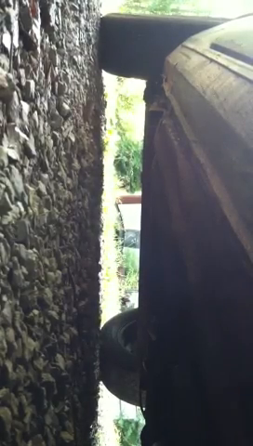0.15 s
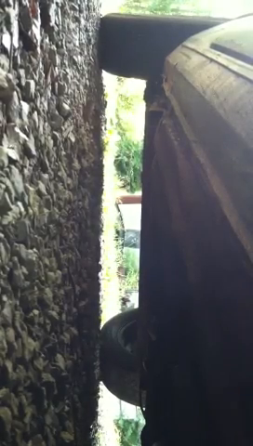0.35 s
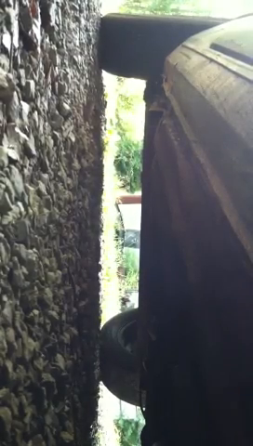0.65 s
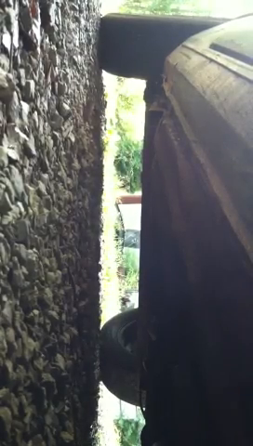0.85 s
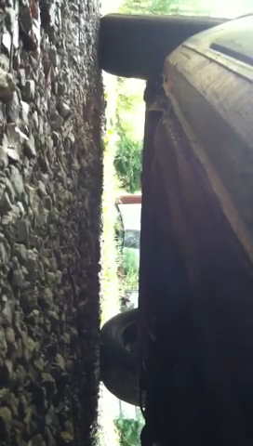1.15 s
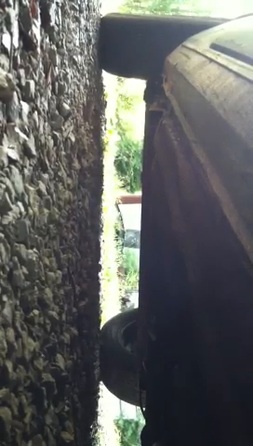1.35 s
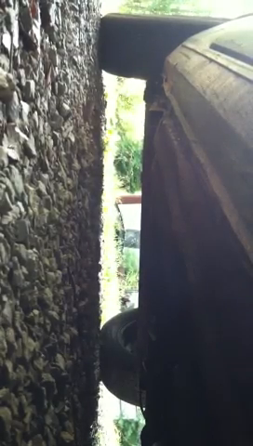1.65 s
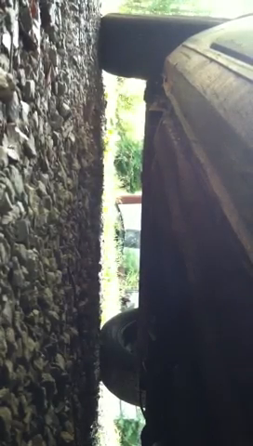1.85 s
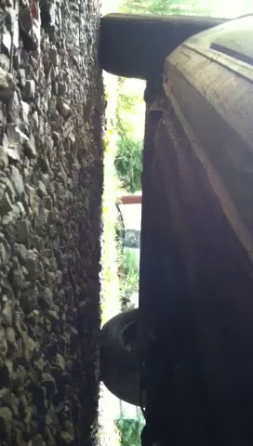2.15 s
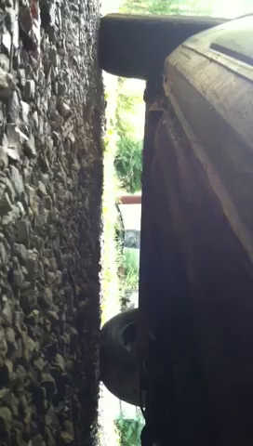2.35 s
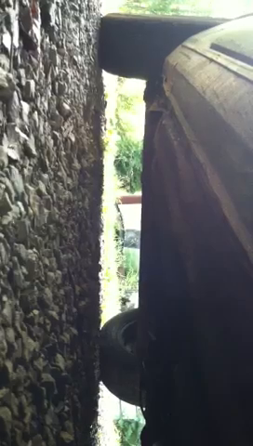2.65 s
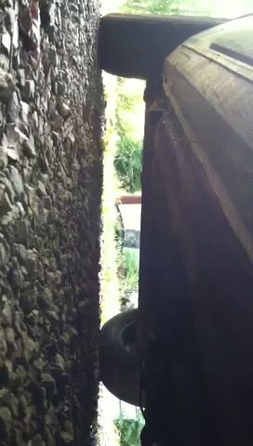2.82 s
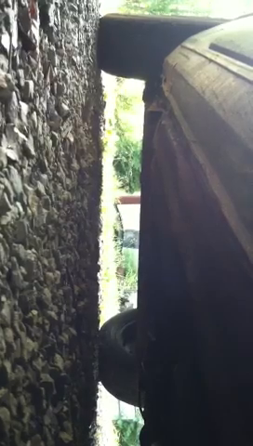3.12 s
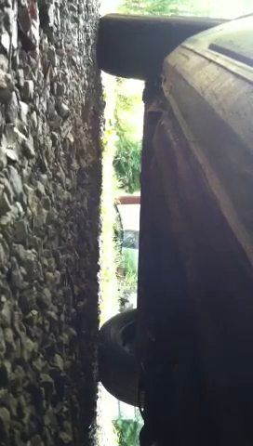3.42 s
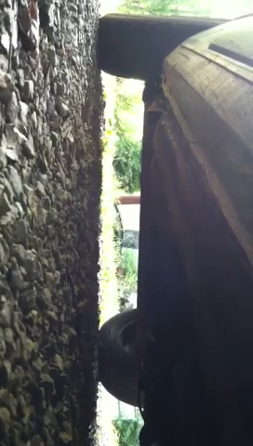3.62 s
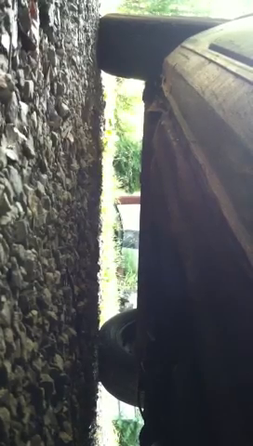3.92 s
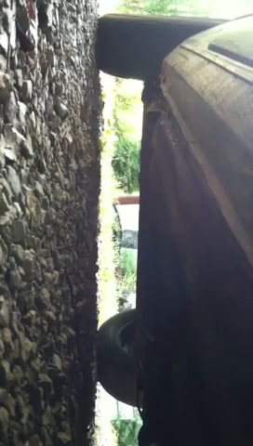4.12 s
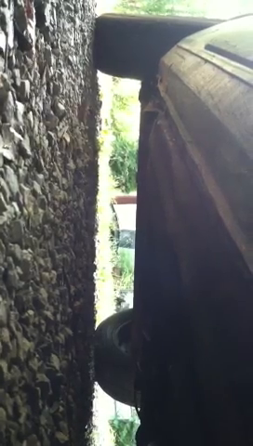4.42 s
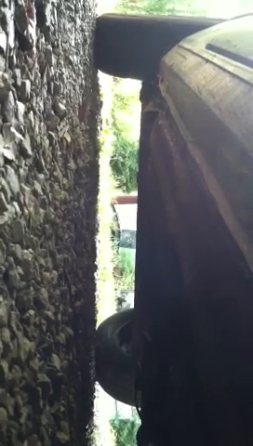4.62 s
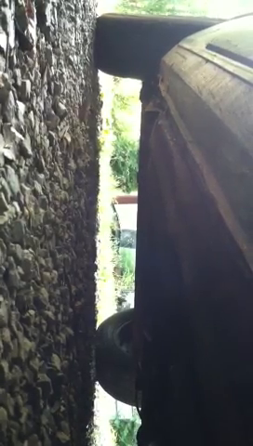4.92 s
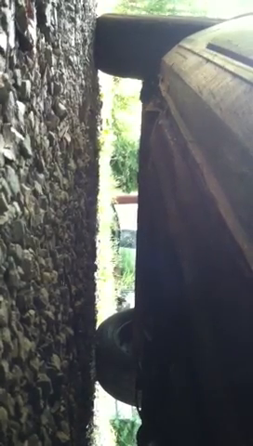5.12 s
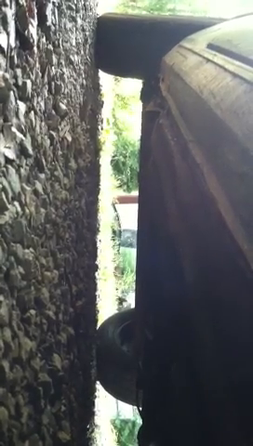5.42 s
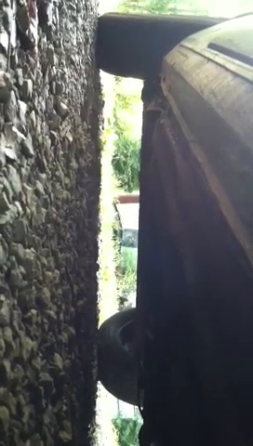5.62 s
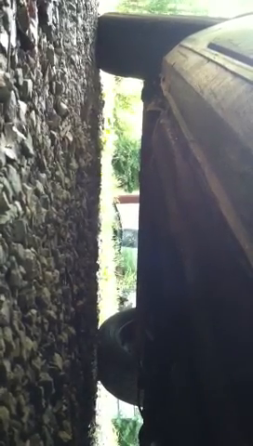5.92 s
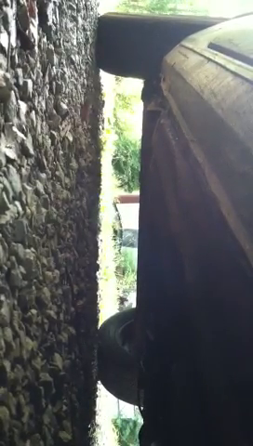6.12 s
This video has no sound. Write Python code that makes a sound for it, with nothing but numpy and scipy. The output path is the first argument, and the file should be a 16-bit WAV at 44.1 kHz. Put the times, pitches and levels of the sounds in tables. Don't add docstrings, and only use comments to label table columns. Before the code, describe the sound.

A loud, flattened close microphone beneath a car catches a low, lumpy idle from an open pipe, each firing a ringing boom with a burst of coarse hiss and metallic ticking. The pace wavers slightly. Then the fire stops, the pistons puff air ever more slowly, linkage knocks dully, thin whistling squeaks fade, and a quiet outdoor yard is left.

```python
import sys
import numpy as np
from scipy import signal
from scipy.fft import rfft, irfft, next_fast_len
from scipy.io import wavfile
from scipy.ndimage import uniform_filter1d

SR = 44100
rng = np.random.default_rng(int(sys.argv[2]) if len(sys.argv) > 2 else 0)


def amplitude_ratio(level_db):
    exponent = np.asarray(level_db, float) / 20
    return 10 ** exponent


def pcm_store(signal):
    levels = np.round(np.clip(np.atleast_2d(signal), -1, 1) * 32767)
    wavfile.write(sys.argv[1], SR, levels.astype(np.int16).T)


N = 276507
KEY_OFF_S = 4.7
IDLE_PER_S = 37.4


def evened(x):
    return x / np.sqrt(np.mean(x ** 2) + 1e-20)


def add(mix, s, sound):
    at = round(s * SR)
    sound = sound[max(-at, 0):]
    part = mix[max(at, 0):][:len(sound)]
    part += sound[:len(part)]


def curve(rows, column):
    rows = np.array(rows)
    return np.interp(np.arange(N) / SR, rows[:, 0], rows[:, column])


def filtered(x, order, hz, kind="low"):
    return signal.sosfilt(signal.butter(order, hz, kind, fs=SR, output="sos"), x)


def resonate(x, hz, width):
    turn = np.exp(2j * np.pi * np.cumsum(hz * np.ones(len(x))) / SR)
    r = np.exp(-np.pi * width / SR)
    return 2 * (turn * signal.lfilter([1 - r], [1, -r], x / turn)).real


def coloured(x, spectrum):
    hz, db = np.transpose(spectrum)
    size = next_fast_len(N)
    bins = np.log(np.fft.rfftfreq(size, 1 / SR) + 1)
    return irfft(rfft(x, size) * amplitude_ratio(np.interp(bins, np.log(hz), db)), size)[:N]


def patchy(x, depth_db):
    z = signal.stft(x, nperseg=256)[2]
    field = rng.standard_normal(z.shape[::-1])
    field = uniform_filter1d(uniform_filter1d(field, size=5, axis=0), size=8, axis=1)
    return signal.istft(z * amplitude_ratio(depth_db * evened(field).T), nperseg=256)[1][:N]


# (time [s], rate [firings/s])
SPEED = [(0.0, 38.01), (0.298, 36.25), (0.478, 36.46), (0.715, 37.62), (0.999, 38.37), (1.542, 35.94),
         (2.111, 39.23), (2.73, 36.13), (2.913, 36.2), (3.487, 39.29), (3.997, 37.0), (4.29, 36.6),
         (4.7, 39.43)]


def firings():
    turns = np.cumsum(curve(SPEED, column=1)) / SR - .34
    turns = turns[:round(SPEED[-1][0] * SR)]
    times = np.nonzero(np.diff(np.floor(turns)))[0] / SR
    return np.r_[times[0] - np.arange(len(CYLINDERS), 0, -1) / SPEED[0][1], times]


def ring(modes, spread_db, detune):
    t = np.arange(12000)[:, None] / SR
    hz, db, t60, sign = np.transpose(modes)
    uneven, off = rng.standard_normal((2, len(modes)))
    fade = amplitude_ratio(db + spread_db * uneven - 60 * t / t60)
    return fade * np.sin(2 * np.pi * hz * (1 + detune * off) * t) @ np.sign(sign)


# (delay [ms], level [dB], manifold echo [ms], its gain [factor],
# collector echo [ms], its gain [factor])
CYLINDERS = [(-1.24, -1.1, 5.17, -0.17, 8.29, 0.37), (-1.65, -1.0, 3.67, -0.18, 8.46, 0.29),
             (-1.29, -1.7, 4.42, 0.15, 7.93, 0.4), (-1.7, -1.4, 2.83, -0.17, 8.63, 0.25)]
# (pitch [Hz], level [dB], time to fade by 60 dB [s], polarity [+1 or -1])
PIPE = [(110, -13.5, 0.033, 1), (131, -41.5, 0.84, 1), (177.7, -12.5, 0.057, -1), (200.93, -8, 0.34, -1),
        (206, -14.5, 0.3, -1), (226, -11.5, 0.061, 1), (283, -7.5, 0.081, 1), (308.6, -19.5, 0.13, -1),
        (332, -24, 0.13, 1), (372.8, -16.5, 0.11, -1), (432.5, -27.5, 0.26, -1), (488, -27, 0.105, -1),
        (575, -40.5, 0.072, -1), (766, -41, 0.053, -1)]


def exhaust_boom(times, last):
    boom = np.zeros(N)
    surge = np.interp(times, *np.transpose(SPEED)) - IDLE_PER_S
    pop_db = 0 * last
    for k, (s, jitter) in enumerate(zip(times, rng.standard_normal(len(times)))):
        late_ms, db, near_ms, near, far_ms, far = CYLINDERS[k % 4]
        pulse = amplitude_ratio(db - 0.25 + 0.28 * surge[k] + pop_db[k]) * ring(PIPE, 0.95, 0.0011)
        for echo_ms, gain in (0, 1), (near_ms, near), (far_ms, far):
            add(boom, s + (late_ms + echo_ms) / 1000 + .0001 * jitter, gain * pulse)
    return boom


def puffs(times, levels_db, rise, fall, rest):
    t, out = np.arange(4000) / SR, np.full(N, rest)
    for s, db in zip(times, levels_db):
        add(out, s, amplitude_ratio(db) * (1 - np.exp(-(t / rise) ** 2)) * np.exp(-t / fall))
    return out


BRANCH_HZ = [770, 495, 872, 557]


def swirl(times, habit):
    own, out = [], np.zeros(N)
    for gust, hz in zip(rng.standard_normal((len(CYLINDERS), 1100)), BRANCH_HZ):
        own.append(evened(gust + 0.44 * evened(resonate(gust, hz, 160))))
    for k, s in enumerate(times):
        add(out, s, own[k % len(own)])
    return habit * out + np.sqrt(1 - min(habit, 1) ** 2) * rng.standard_normal(N)


# (pitch [Hz], width [Hz], level [dB])
ROUGH = [(231, 30, -10), (296.8, 15.6, -7.5), (351.7, 31.8, 2), (371.6, 55.7, 2), (481.9, 34.4, -0.5),
         (593.5, 44.4, -5), (656.5, 80, -7.5), (744, 24.4, -10), (827, 52, -11), (913.7, 15.6, -12),
         (1014, 54, -12.5), (1127, 24, -16), (1169, 23, -15)]


def rough_gas(noise, pitch_scale):
    out = np.zeros(N)
    for k, (hz, width, db) in enumerate(ROUGH):
        out += (-1) ** k * amplitude_ratio(db) / np.sqrt(width) * resonate(noise, hz * pitch_scale, width)
    return out


# (pitch [Hz], level [dB per Hz])
JET = [(740, -7), (1250, 4.5), (1370, -44), (1480, 1), (1710, -1.5), (2300, 5), (2670, 0.5), (3000, -7.5),
       (3290, -32.5), (3980, -17.5), (5580, -7.5), (6400, -15.5), (12000, -19.5), (14200, -30.5),
       (15500, -33)]
# (pitch [Hz], width [Hz], level [dB])
SHIELD = [(1465, 8.3, 2.5), (1824, 17, 5.5), (3230, 33, -1), (3350, 140, -3), (5400, 58, -11),
          (5600, 50, -36)]


def jet(flow):
    noise, fizz = rng.standard_normal((2, N))
    shield = np.zeros(N)
    for hz, width, db in SHIELD:
        shield += amplitude_ratio(db) / np.sqrt(width) * resonate(flow * noise, hz, width)
    low = filtered(evened(flow * noise), 2, 8000)
    top = filtered(evened(flow ** 1.25 * fizz), 2, 8000, "high")
    return evened(coloured(patchy(low + top, depth_db=3.0), JET)) + amplitude_ratio(-8.5) * evened(shield)


def ticks(times):
    out, t = np.zeros(N), np.arange(900) / SR
    for s, (band, place, late, size) in zip(np.repeat(times, 2), rng.random((2 * len(times), 4))):
        hz, db = (2350, -27) if band < .6 else (5600, -37)
        tick = np.sin(2 * np.pi * hz * (0.793 + 0.37 * place) * t)
        tick *= np.exp(-t / 0.00073) * (1 - np.exp(-t / 0.0002))
        add(out, s + .007 * late ** 3, amplitude_ratio(db - 3.0 * np.log(size + .08)) * tick)
    return out


# (rough gas level [dB], hiss level [dB])
GASPS = [(1.5, 5), (1, 5.5), (-1.5, 5), (1, 7)]


def idle():
    times = firings()
    last = times == times[-1]
    boom = exhaust_boom(times, last)
    uneven = rng.standard_normal((len(times), 2)).T
    gasp_db = np.resize(GASPS, (len(times), 2)).T
    on = np.arange(N) < KEY_OFF_S * SR
    throttle = curve(SPEED, column=1) - IDLE_PER_S

    rough_db = gasp_db[0] + 5.5 * last + 2.1 * uneven[0]
    flow = on * puffs(times - .004, rough_db, rise=0.0005, fall=0.011, rest=0.36)
    rough = rough_gas(flow * swirl(times - .004, habit=0.67), 0.98)
    rough *= amplitude_ratio(-23.5 + 0.8 * throttle) / rough[on].std()

    steady = .08 * amplitude_ratio(4.5 * throttle)
    early = puffs(times - .011, gasp_db[1] - 18.5, rise=0.00083, fall=.005, rest=0.)
    hiss_db = gasp_db[1] - 2 * last + 1.2 * uneven[1]
    main = puffs(times - .001, hiss_db, rise=0.0018, fall=0.01, rest=steady)
    hiss = jet(on * (early + main))
    hiss *= amplitude_ratio(-39 + 0.37 * throttle) / hiss[on].std()
    return boom + rough + hiss + ticks(times)


# (pitch [Hz], level [dB per Hz])
YARD = [(24, -49), (40, -14.5), (96, -9), (129, -5.5), (160, -0.5), (237, -4), (350, -13), (468, -17),
        (504, -12), (744, -23.5), (1210, -24.5), (3900, -40.5), (5100, -27.5), (6190, -42), (13500, -47.5)]


def yard():
    return amplitude_ratio(-58.5) * evened(coloured(rng.standard_normal(N), YARD))


# (pitch [Hz], level [dB], time to fade by 60 dB [s],
# polarity [+1 or -1])
COLD = [(62, -15.5, 0.46, 1), (97, -21, 0.18, 1), (129, 2, 0.044, -1), (175.5, 5, 0.13, 1),
        (212.8, -6, 0.32, 1), (233.4, -5.5, 0.36, 1), (304, -28, 0.086, -1), (356.7, -9, 0.21, 1),
        (483, -31, 0.3, -1), (624, -21, 0.083, 1), (860, -19, .14, -1)]


def thumps(times, levels_db):
    t, boom = np.arange(N) / SR, np.zeros(N)
    cooling = np.interp(t, [4.7, 4.95], [.97, .86])
    for s, db in zip(times, levels_db):
        pitch_scale = cooling[round(s * SR)] / cooling[-1]
        thump = ring(np.multiply(COLD, [pitch_scale, 1, 1, 1]), 2.2, .012)
        thump = filtered(thump * (1 - np.exp(-t[:len(thump)] / 0.0028)), 3, 80, "high")
        add(boom, s, amplitude_ratio(db - 2.0) * thump / abs(thump).max())
    return boom


# (pitch [Hz], level [dB per Hz])
LEAK = [(60, -7), (170, 2.5), (300, -10), (500, -9.5), (900, -14.5), (1600, -14), (2300, -16.5),
        (2900, -24), (5000, -24.5), (10000, -30), (15000, -48.5)]


def leftover_gas():
    t = np.arange(N) / SR
    since_off = t - KEY_OFF_S
    rough = rough_gas(rng.standard_normal(N), 0.99)
    rough /= rough[round(4.7 * SR):round(5.2 * SR)].std()
    rough *= amplitude_ratio(-40 - 51 * np.maximum(since_off - 0.46, 0))
    leak_db = -41 - 13.5 * since_off - 150 * np.maximum(t - 5.59, 0)
    leak = amplitude_ratio(leak_db) * evened(coloured(patchy(rng.standard_normal(N), depth_db=1.0), LEAK))
    return (rough + leak) * np.clip(since_off / .02, 0, 1)


# (time [s], level [dB])
STROKES = [(4.708, -7), (4.737, -5.5), (4.763, -7), (4.798, -3.5), (4.828, -7.5), (4.862, -7),
           (4.898, -8.5), (4.94, -10), (4.983, -9), (5.037, -12), (5.098, -10.5), (5.178, -18),
           (5.309, -31.5)]


def rundown():
    times, thump_db = np.transpose(STROKES)
    hiss_db = -33 + 0.45 * thump_db - 6 * (times - KEY_OFF_S)
    flow = puffs(times, hiss_db, rise=0.00086, fall=0.014, rest=0.)
    hiss = flow.std() * jet(flow)
    rasp_db = -15.5 + 0.72 * thump_db
    flow = puffs(times - .003, rasp_db, rise=0.00069, fall=0.013, rest=0.)
    rasp = flow.std() * evened(rough_gas(flow * rng.standard_normal(N), .985))
    return thumps(times, thump_db) + hiss + rasp + leftover_gas()


# (start [s], length [s], pitch [Hz], wobble [Hz], level [dB])
SQUEAKS = [
    (5.355, .11, 3079, 55, -54),
    (5.53, .12, 3079, 80, -59.5),
    (5.21, .05, 3079, 50, -62),
    (5.31, .5, 2245, 14, -62),
    (5.3, .38, 1556, 60, -59),
    (5.45, .33, 2003, 6, -67),
]


def squeaks():
    out = np.zeros(N)
    for s, length, hz, width, db in SQUEAKS:
        wobble = width * evened(uniform_filter1d(rng.standard_normal(round(length * SR)), size=400))
        whistle = np.sin(2 * np.pi * np.cumsum(hz + wobble) / SR)
        fade = amplitude_ratio(db - np.linspace(0, 17, len(whistle)))
        add(out, s, fade * whistle * signal.windows.tukey(len(whistle), .3))
    return out


# (time [s], level [dB], pitch [Hz], time to fade by 60 dB [s])
CLUNKS = [
    (5.223, -36, 1120, .07),
    (5.311, -34, 1110, .08),
    (5.313, -37, 1560, .09),
    (5.33, -39, 2240, .09),
    (5.34, -43, 1600, .1),
    (5.485, -46, 1600, .1),
    (5.491, -48, 2200, .08),
    (5.777, -63, 1600, .06),
]


def clunks():
    out, t = np.zeros(N), np.arange(6000) / SR
    for s, db, hz, t60 in CLUNKS:
        knock = rng.standard_normal(len(t)) * amplitude_ratio(-60 * t / t60) * (1 - np.exp(-t / 0.0029))
        body = resonate(resonate(knock, hz, 360), hz, 320)
        body += 0.13 * resonate(resonate(knock, 1100, 1230), 1100, 1200)
        add(out, s, amplitude_ratio(db - 2.0) * body / abs(body).max())
    return out


def scene():
    return (idle() + yard() + rundown() + squeaks() + clunks())[None]


def low_pass(x):
    return signal.sosfilt(signal.butter(12, 15720, fs=SR, output="sos"), x)


def record(dry):
    thin = filtered(dry, 2, 55, "high")
    knee, top = .55, .715
    over = np.maximum(abs(thin) - knee, 0)
    squeezed = (top - knee) * np.tanh(over / (top - knee))
    held = np.sign(thin) * (np.minimum(abs(thin), knee) + squeezed)
    return low_pass(filtered(held, 8, 14200))


dry = scene()
out = record(dry)
pcm_store(out)
```